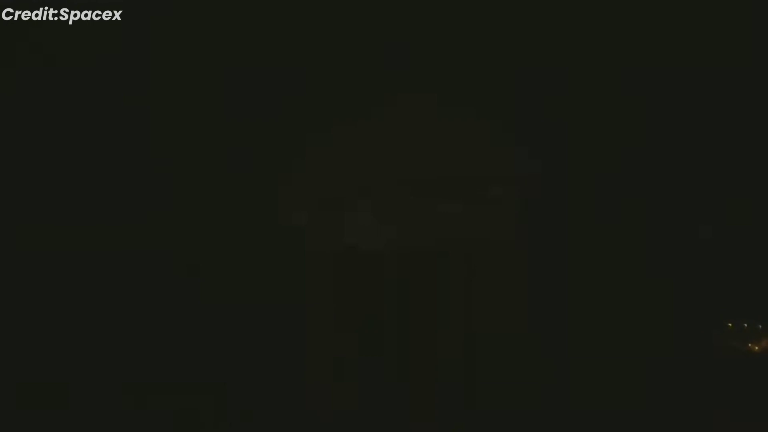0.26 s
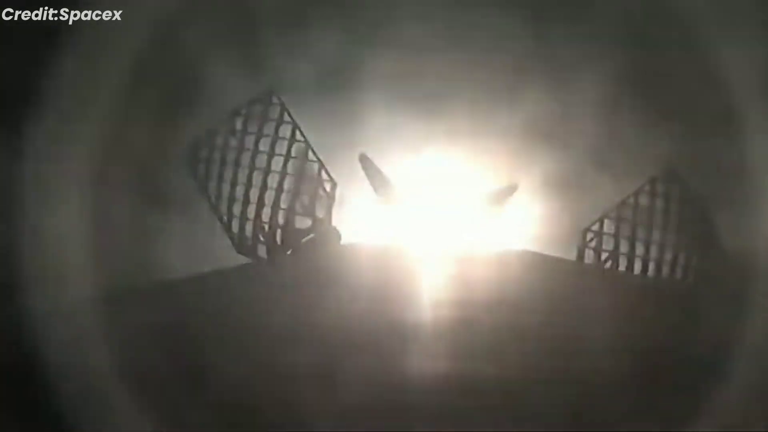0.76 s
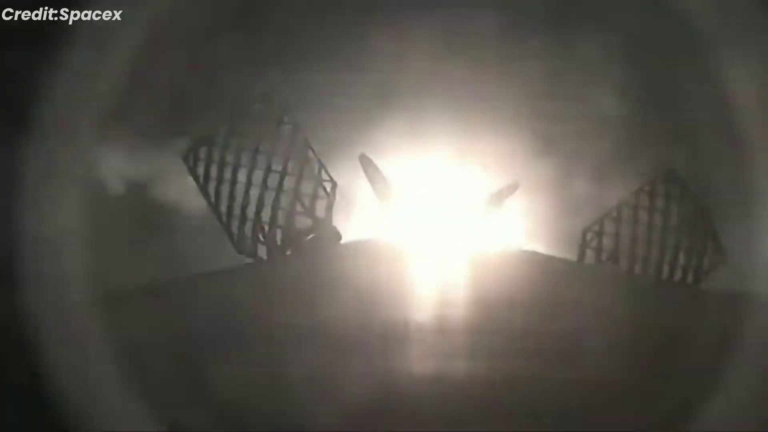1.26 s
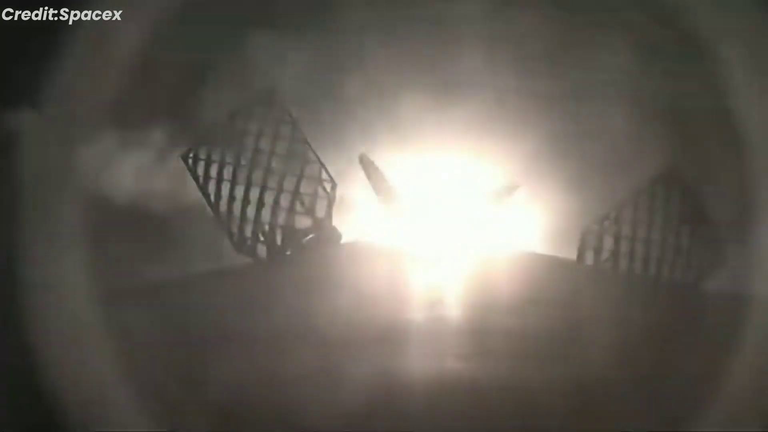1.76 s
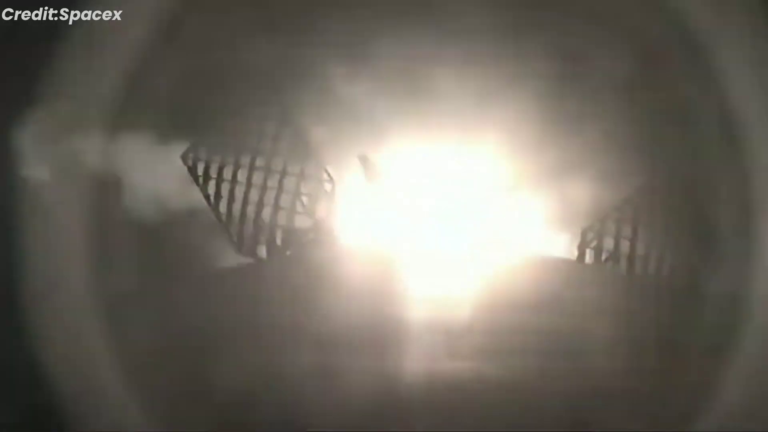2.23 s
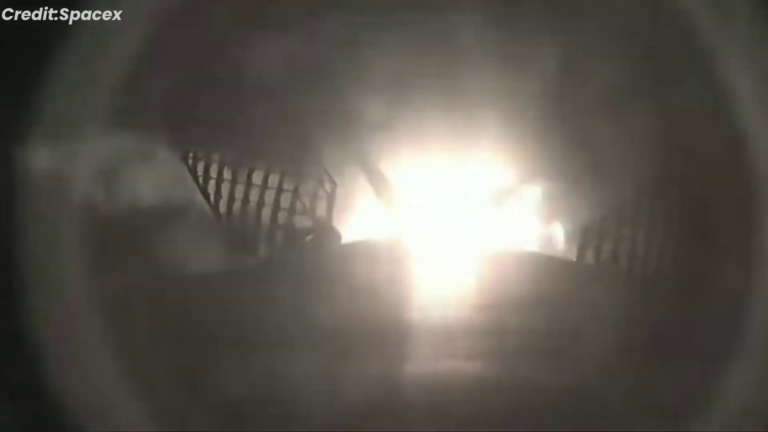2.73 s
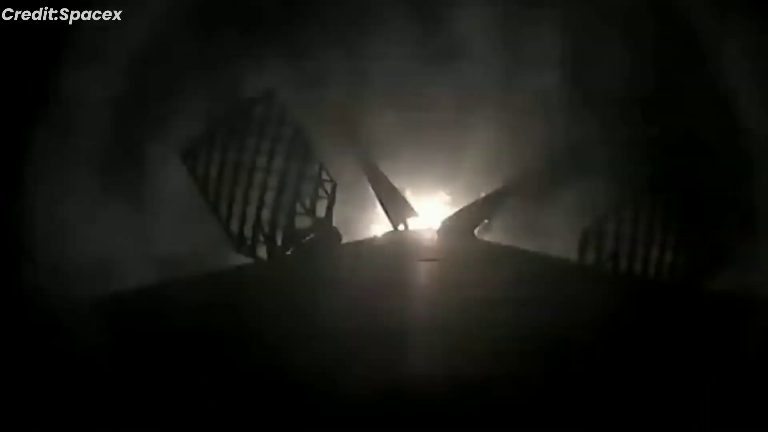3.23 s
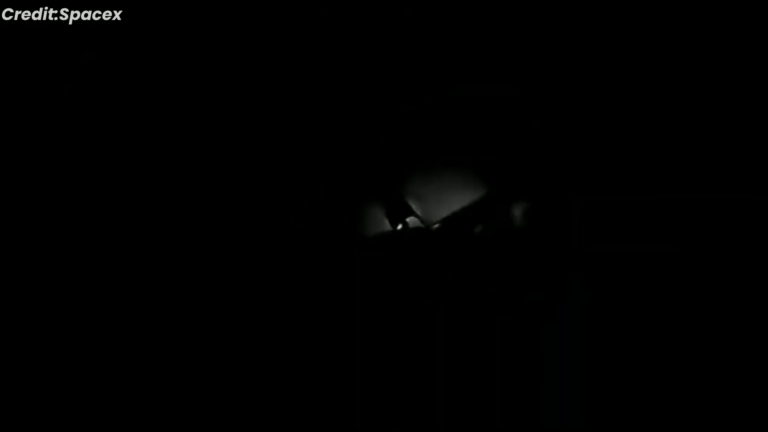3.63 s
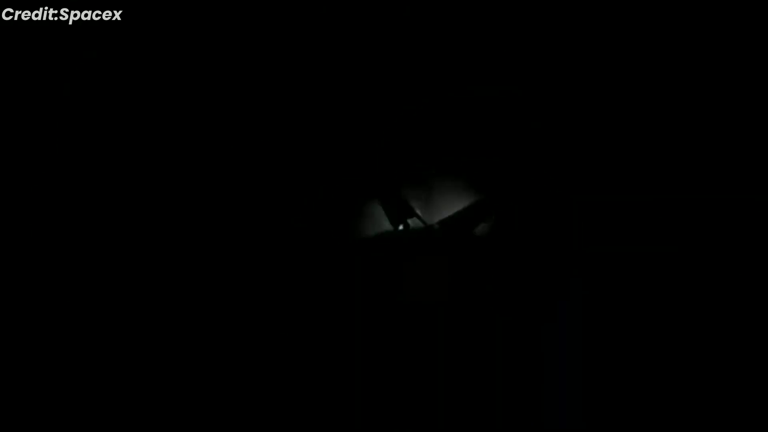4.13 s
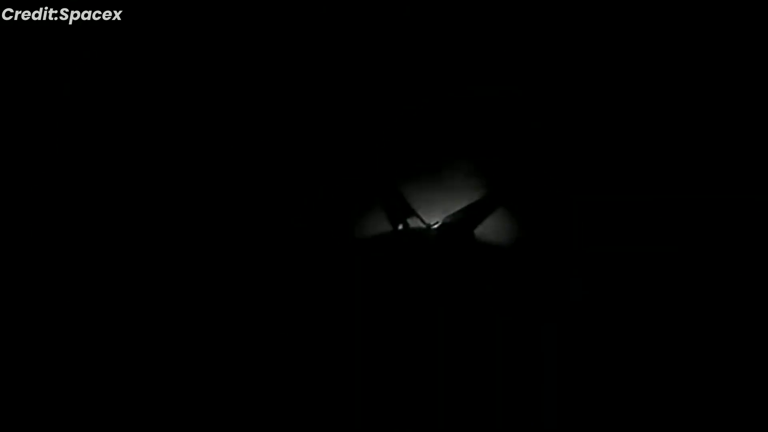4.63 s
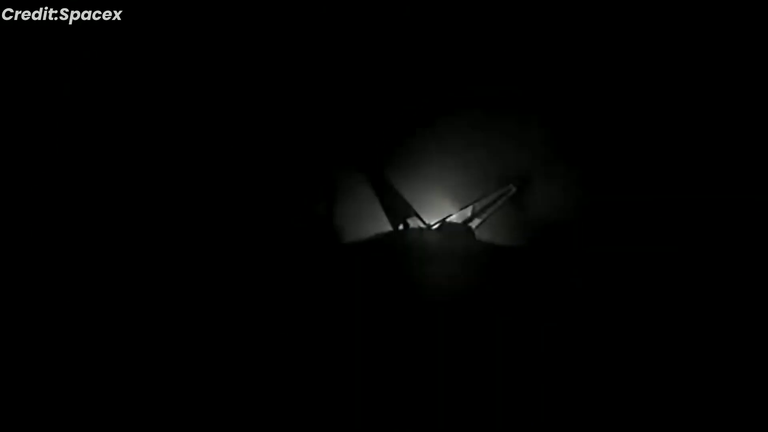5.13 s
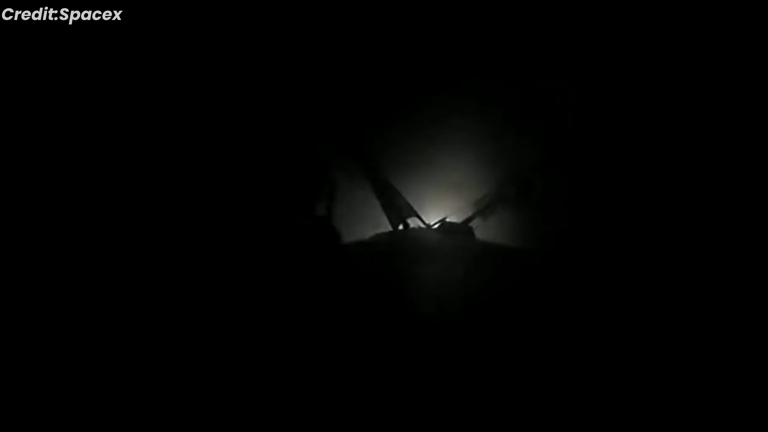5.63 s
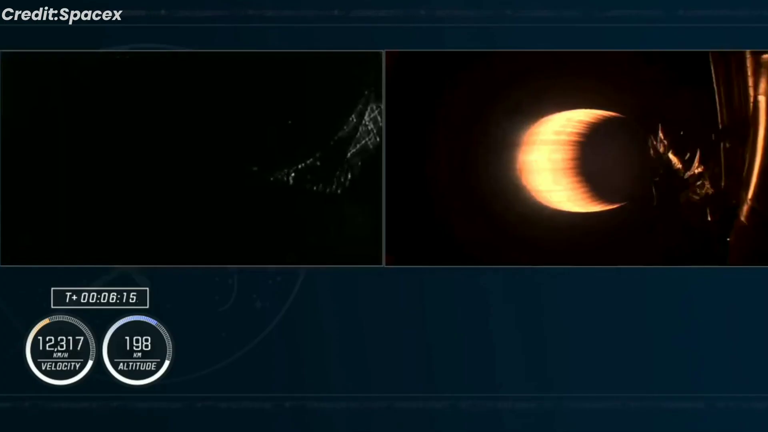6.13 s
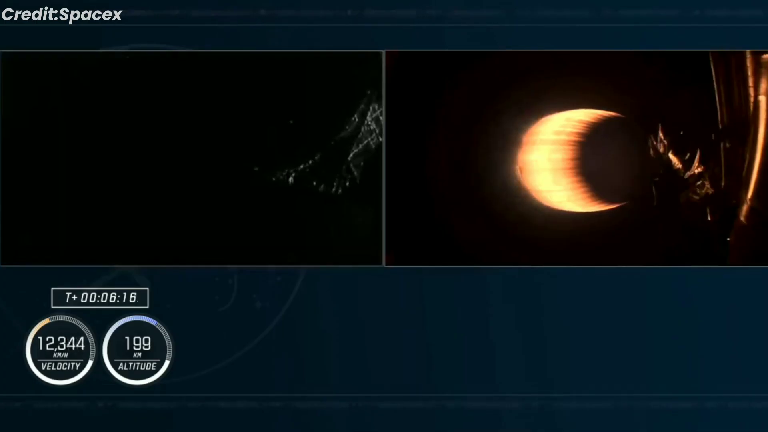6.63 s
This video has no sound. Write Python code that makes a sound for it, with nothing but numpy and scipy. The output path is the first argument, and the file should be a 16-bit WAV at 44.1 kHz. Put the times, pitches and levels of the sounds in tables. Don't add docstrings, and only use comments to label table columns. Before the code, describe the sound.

Deep, lumpy rocket roar heard from far away, thudding and slowly weakening under electrical buzz and hiss, then suddenly switched off, leaving faint idle hiss.

```python
import sys
import numpy as np
from scipy import signal
from scipy.fft import next_fast_len
from scipy.io import wavfile
from scipy.ndimage import uniform_filter1d

SR = 44100
rng = np.random.default_rng(int(sys.argv[2]) if len(sys.argv) > 2 else 0)


def unload_audio(sound):
    columns = np.transpose(np.atleast_2d(sound))
    steps = np.round(np.clip(columns, -1, 1) * 32767)
    wavfile.write(sys.argv[1], SR, steps.astype(np.int16))


def gain_from_decibels(decibels):
    exponent = np.asarray(decibels, float) / 20
    return 10 ** exponent


N = 303319
T = np.arange(N) / SR
CUT_S = 5.7343
LINE_RISES_S = 0.285


def evened(x):
    return x / np.sqrt(np.mean(x ** 2) + 1e-20)


def curve(rows, index):
    return np.interp(T, [row[0] for row in rows], [row[index] for row in rows])


def drift(rate_hz):
    t = T[::64]
    slow = np.zeros(len(t))
    for f in np.geomspace(rate_hz / 10, rate_hz, num=24):
        slow += np.sin(2 * np.pi * (f * t + rng.random())) / np.sqrt(f)
    return evened(np.interp(T, t, slow))


def band(x, lo_hz, hi_hz):
    sos = signal.butter(N=4, Wn=[lo_hz, hi_hz], btype="band", fs=SR, output="sos")
    return signal.sosfiltfilt(sos, x)


def noise(colour, patchy_db, stretch=0.98, size=1024):
    hop = size // 4
    frames, hz = N // hop + 5, np.fft.rfftfreq(size, 1 / SR)
    a, b, patches = rng.standard_normal((frames, len(hz), 3)).T
    patches = uniform_filter1d(patches, size=7, axis=0)
    patches = evened(uniform_filter1d(patches, size=8, axis=1))
    frame_at = np.minimum(np.arange(frames) * hop, N - 1)
    slide = (stretch * np.ones(N))[frame_at]
    f, level_db = np.transpose(colour)
    shape_db = np.interp(np.log(hz[:, None] / slide + 1), np.log(f + 1), level_db)
    z = (a + 1j * b) * gain_from_decibels(shape_db + patchy_db * patches)
    z /= np.sqrt(np.mean(gain_from_decibels(shape_db) ** 2, axis=0))
    return evened(signal.istft(z, nperseg=size, noverlap=size - hop)[1][:N])


# t/s, level/dB
GAIN = [(0, -0.5), (.95, -1), (2.05, 2.5), (2.5, 1.5), (2.57, -0.5), (3.3, 3), (5.2, 6), (5.74, 6)]


def control_db():
    return curve(GAIN, index=1)


SPIKE_HZ = 981.9


def pitted(x, comb_db, share):
    hz, t, z = signal.stft(x, SR, nperseg=512, noverlap=384)
    comb = np.cos(2 * np.pi * hz / SPIKE_HZ)[:, None]
    rows, columns = (hz / 200).astype(int), (t / .02).astype(int)
    cells = rng.random((200, 400))[rows][:, columns]
    holes = (cells < share * (1 - .6 * comb)) & (hz[:, None] > 5200)
    return signal.istft(z * gain_from_decibels(comb_db * comb - 18 * holes), SR, nperseg=512, noverlap=384)[1][:N]


# f/Hz, level/dB per Hz
IDLE_COLOUR = [(12, -32), (20, 2.5), (167, 0.5), (640, -7.5), (1120, -12), (2000, -15), (2520, -16.5),
               (3750, -18), (4000, -19.5), (4300, -31.5), (9000, -31), (15800, -33)]


def idle_line():
    return gain_from_decibels(-63) * pitted(noise(IDLE_COLOUR, 1.4, size=2048), .1, 0.11)


# f/Hz, level/dB rms
WHINE = [
    (1332, -82.5),
    (2664, -86),
]


def whine():
    lift_db = np.where(T < CUT_S, control_db() + 11.3, 0)
    return sum(np.sqrt(2) * gain_from_decibels(db + lift_db) * np.sin(2 * np.pi * hz * T) for hz, db in WHINE)


# f/Hz, level/dB per Hz
HISS_COLOUR = [(1200, -30), (2000, -11), (3300, -14.5), (4500, -16.5), (6400, -17.5), (7250, -19.5),
               (7420, -20), (7600, -22), (9300, -18), (9500, -24), (9700, -21), (12000, -19), (12400, -37),
               (15600, -36)]


def hiss():
    level_db = -64.5 + control_db() + .5 * drift(13) - 2.0 * (T < LINE_RISES_S)
    return pitted(noise(HISS_COLOUR, 1.4, size=512), 0.99, 0.14) * gain_from_decibels(level_db)


# number, level/dB
SPIKE = [(1, 4), (2, 1.5), (3, 0), (4, -2.5), (5, -5), (6, -8.5), (7, -12), (8, -14.5), (9, -25),
         (10, -19.5), (11, -35)]


def buzz():
    turns = 2 * np.pi * np.cumsum(SPIKE_HZ + 0.5 * drift(3)) / SR
    jitter = 0.025 * evened(band(rng.standard_normal(N), 5., 220.))
    nudged = turns + 0.18 * np.sin(turns / 8) + jitter
    lines = np.zeros(N)
    for k, db in SPIKE:
        lines += gain_from_decibels(db + 0.086 * k * drift(30)) * np.cos(round(k) * (nudged + 1.24))
    level_db = -65 + 0.96 * control_db() - 5.1 * (T < LINE_RISES_S)
    return np.sqrt(2) * gain_from_decibels(level_db) * lines


def blocks(length_s, keep=0):
    value, fresh = rng.random((2000, 2)).T
    last = np.maximum.accumulate(np.arange(2000) * (fresh >= keep))
    return value[last][(T / length_s).astype(int)]


FOLD_HZ = (5634, 5856, 6000)
# t/s, chance 0-1
FOLD_SHARE = [(0, 1), (1.1, .95), (1.2, .45), (3.8, .45), (3.9, .8), (5.8, .9)]


def folded(x):
    source = signal.hilbert(pitted(band(x, 5900, 10000), 3, 0), next_fast_len(N))[:N]
    large_hz = np.where(T < 3.8, *FOLD_HZ[1:])
    small = (source * np.exp(2j * np.pi * FOLD_HZ[0] * T)).real
    large = (source * np.exp(2j * np.pi * large_hz * T)).real
    chosen = 1. * (blocks(.02, keep=.35) < curve(FOLD_SHARE, index=1))
    pick = np.clip(uniform_filter1d(chosen, size=120), 0, 1)
    level_db = uniform_filter1d(1.7 * blocks(.04), size=200) - 1.5
    top = band(np.sqrt(1 - pick) * small + np.sqrt(pick) * large, 11950, 18000)
    lifted = top + 0.3 * band(top, 14000.0, 17000.)
    return x + lifted * gain_from_decibels(level_db)


# t/s, peak level/dB, f/Hz
BLASTS = [(0.048, -11.5, 208), (0.303, -17.5, 288), (0.408, -12.5, 228.5), (0.711, -13, 254),
          (1.003, -21, 270), (1.178, -16.5, 269), (1.386, -30, 285), (1.84, -38, 236), (2.157, -21, 272),
          (2.261, -20, 280), (2.518, -9, 281), (2.988, -12, 233.5), (3.054, -19, 245), (3.27, -22, 300),
          (3.331, -17.5, 365), (3.733, -13, 345), (3.811, -17.5, 263), (3.935, -22, 330), (4.139, -16, 289),
          (4.361, -25, 370), (4.464, -27, 265), (4.705, -15, 250), (4.797, -32, 260), (4.908, -16.5, 230),
          (4.974, -14.5, 314), (5.365, -19.5, 462)]


def blasts():
    out, t = np.zeros(N), np.arange(3000) / SR
    shape = (t / .007) ** 2.0 * np.exp(-t / 0.0059)
    shape /= shape.max()
    for (s, db, hz), turn in zip(BLASTS, rng.random((len(BLASTS), 1))):
        part = out[round(s * SR):][:len(t)]
        part += gain_from_decibels(db - 9.0) * shape * np.sin(2 * np.pi * (hz * t + turn))
    return out


# f/Hz, level/dB per Hz
RUMBLE_COLOUR = [(12, -63), (20, -27.5), (91, -41), (142, -11), (225, 2.5), (310, 0), (406, -13.5),
                 (507, -23), (665, -28.5), (900, -25.5), (1170, -51.5), (1980, -120)]
GROWL_COLOUR = [(200, -30), (320, -2.5), (380, 2.5), (450, -9.5), (506, -0.5), (580, -8), (800, -35.5),
                (2000, -100)]
ROAR_COLOUR = [(12, -47), (20, -30), (70, -21.5), (185, 10.5), (400, -4), (620, 2.5), (800, -2), (1210, -6),
               (1680, -14.5), (2000, -18), (2320, -23), (3010, -28), (3500, -36.5), (7000, -100)]
# t/s, rumble level/dB, brightness/dB
CARRY = [(0, -32.5, -2.5), (.8, -25.5, -1.5), (1.25, -32.5, -1), (1.95, -34, 1.5), (2.2, -25.5, 3),
         (3.3, -29.5, 2.5), (4.0, -33, 3), (4.3, -35, 0.5), (4.9, -34, 2), (5.45, -35.5, 1),
         (5.74, -35, 1.5)]
# t/s of the top, lift level/dB, half length/s, share that reaches the growl 0-1
SURGES = [(.06, 10.5, 0.032, .3), (0.345, 2, 0.073, 1), (.55, 3.5, .06, 0.5), (.78, 4, 0.051, 0.1),
          (0.927, 8.5, 0.024, 0.45), (1.078, 8, 0.038, 0.3), (1.382, 7, 0.035, .5), (1.595, 1.5, 0.062, 1),
          (1.836, 1, 0.062, 1), (2.255, 3, 0.03, 1), (2.35, 2.5, .04, .3), (2.524, 3.5, 0.079, .1),
          (2.67, -3, 0.028, 0), (2.83, 5.5, 0.03, 1), (3.037, -4.5, 0.025, 1), (3.138, 4.5, 0.045, 0.9),
          (3.375, 6.5, 0.046, 0.24), (3.723, 7, 0.091, 0.2), (3.92, 5.5, 0.024, 1), (4.028, 7.5, 0.018, .8),
          (4.457, 7, .05, 0.87), (4.69, 7, 0.016, 1), (4.903, 2, 0.025, 0.2), (5.128, 1.5, 0.077, 0.9),
          (5.378, 1.5, 0.025, 1), (5.697, 4, 0.039, 0.9)]


def rumble():
    t = T[::64]
    top_s, lift_db, half_s, share = np.transpose(SURGES)[:, :, None]
    bumps = lift_db * np.exp(-.5 * ((t - top_s) / half_s) ** 2)
    surge_db = np.interp(T, t, bumps.sum(axis=0))
    reach_db = np.interp(T, t, (share * bumps).sum(axis=0))
    bright_db = curve(CARRY, index=2)

    centre = gain_from_decibels(0.15 * bright_db + 0.34 * drift(2.95))
    hump_db = curve(CARRY, index=1) + surge_db + 0.73 * drift(30)
    hump = noise(RUMBLE_COLOUR, 0.59, centre, size=2048) * gain_from_decibels(hump_db)

    growl_db = -35.5 + bright_db + reach_db + 1.8 * drift(30)
    growl = noise(GROWL_COLOUR, 0.49) * gain_from_decibels(growl_db)

    roar_db = -35 + 0.73 * control_db() - 1.03 * T + 0.11 * reach_db
    roar = noise(ROAR_COLOUR, 1.23) * gain_from_decibels(roar_db + 0.35 * drift(60))
    return hump + growl + roar


def switch_off(x):
    x = x + (-.085 - x[0]) * np.cos(2 * np.pi * 260 * T) * np.exp(-T / 0.0082)
    before = np.minimum(T - CUT_S, 0)
    crest = (.14 - x[round(CUT_S * SR)]) * np.cos(2 * np.pi * 290 * before) * np.exp(before / 0.0068)
    after = np.maximum(T - CUT_S, 0)
    tail = gain_from_decibels(-45.0) * (1 - np.exp(-after / 0.0018)) * np.exp(-after / 0.018)
    return np.where(T < CUT_S, x + crest, noise(IDLE_COLOUR, 1.1, stretch=.7) * tail)


def scene():
    live = switch_off(rumble() + blasts() + folded(buzz() + hiss()))
    return (live + whine() + idle_line())[None]


def low_pass(x):
    return signal.sosfilt(signal.butter(12, 16090, fs=SR, output="sos"), x)


def record(dry):
    edge = signal.firwin(2047, 15480, window=("kaiser", 9), fs=SR)
    limited = signal.oaconvolve(dry, edge[None], "same")
    return low_pass(limited)


dry = scene()
out = record(dry)
unload_audio(out)
```